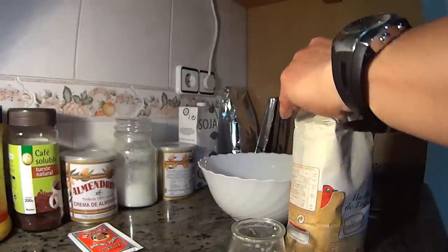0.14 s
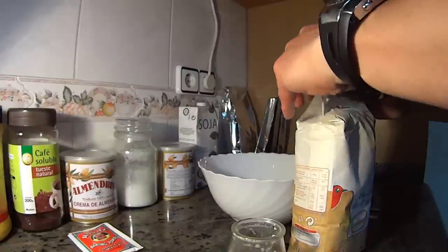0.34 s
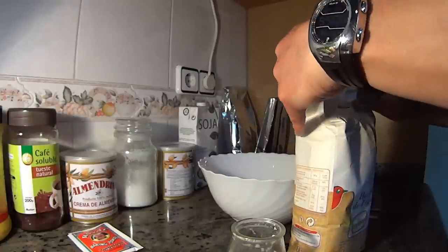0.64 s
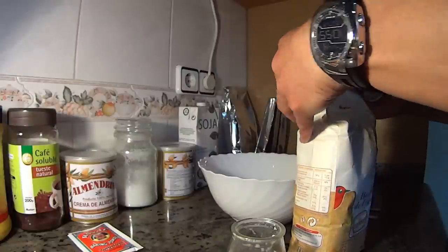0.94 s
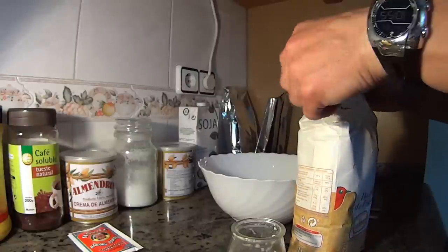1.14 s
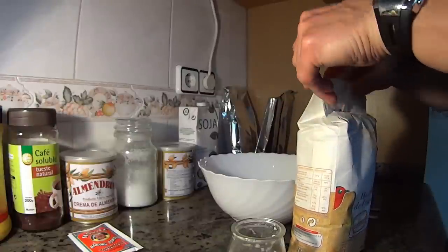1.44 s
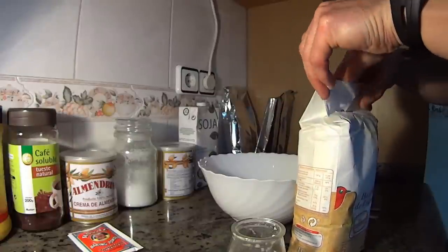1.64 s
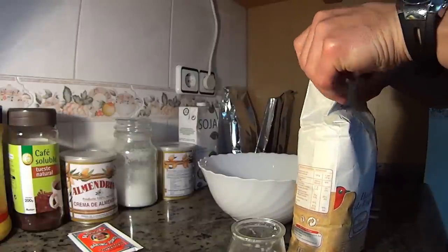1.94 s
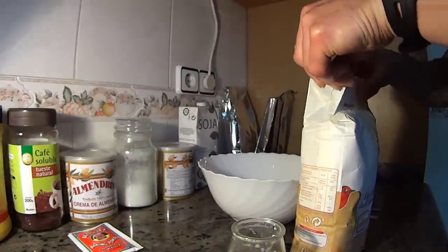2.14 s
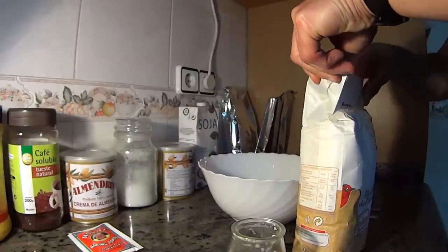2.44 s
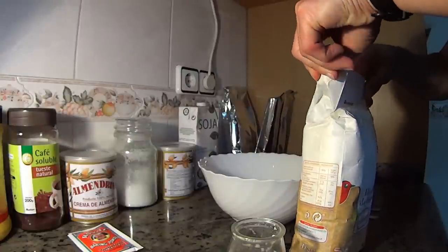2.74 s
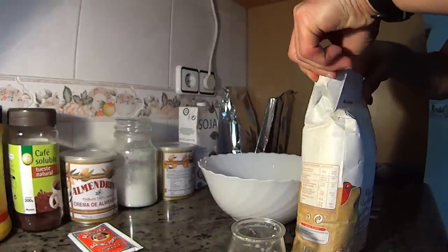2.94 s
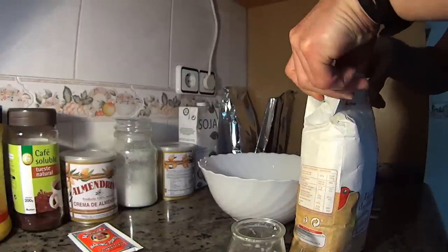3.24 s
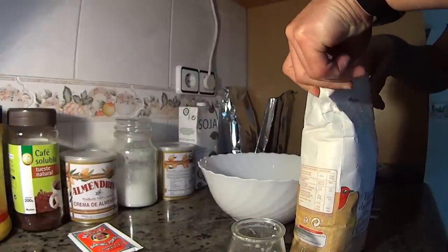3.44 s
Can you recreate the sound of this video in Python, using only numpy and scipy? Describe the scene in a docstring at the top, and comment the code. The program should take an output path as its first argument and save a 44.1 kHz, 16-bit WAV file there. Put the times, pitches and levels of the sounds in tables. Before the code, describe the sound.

A stiff, full paper bag crackles and rustles as a hand unfolds its top, starting with light snaps, then growing denser and louder, with soft hollow thumps, close stereo microphones in a small quiet kitchen.

```python
"""In a kitchen, a hand unfolds the top of a full paper bag on the counter.
Creases snap as sharp cracks with dying runs of slips, answered closely by counter, tiles and jars.
Between them paper rustles and fingertips skid, built from dense random clicks shaped by filters.
Now and then the bag's wall gives: a hollow noise burst over a low boom of decaying sines.
A short noise tail makes the faint room, and filtered noise makes its quiet hush."""
import sys
import numpy as np
from scipy import signal
from scipy.fft import rfft, irfft, next_fast_len
from scipy.io import wavfile

SR = 44100
rng = np.random.default_rng(int(sys.argv[2]) if len(sys.argv) > 2 else 0)


def put_to_file(sound):
    """Save the sound as 16-bit audio at rate SR, in the file named by the first command-line argument."""
    columns = np.atleast_2d(sound).T  # one column per channel
    safe = np.clip(columns, -1, 1)
    whole_steps = np.round(safe * 32767)
    wavfile.write(sys.argv[1], SR, whole_steps.astype(np.int16))


N = 158760
T = np.arange(N) / SR
FFT_SIZE = next_fast_len(N + SR)
HZ = np.arange(FFT_SIZE // 2 + 1) * SR / FFT_SIZE

# Levels are relative unless noted; decays without "T60" are the times to fall to 1/e.
# Creases buckling: (time [s], middle [dB], upper [dB], treble [dB], decay of the slips [s])
SNAPS = [(0.1989, -37, -35, -28, 0.0077), (0.2589, -30.5, -49, -25.5, 0.00093),
         (0.4024, -35.5, -44, -40, 0.0027), (0.4508, -39.5, -38.5, -30, 0.0024),
         (0.5081, -36, -45, -31, 0.0049), (0.5627, -33.5, -36.5, -20, 0.00063),
         (0.602, -36, -40, -30, 0.0013), (0.6391, -26.5, -30, -21.5, 0.0036),
         (0.6805, -27, -33.5, -18.5, 0.0032), (0.7975, -33, -31, -28.5, 0.0017),
         (0.835, -42, -45, -32, 0.0021), (0.9361, -31.5, -34, -21.5, 0.0017),
         (1.0357, -37, -37.5, -24.5, 0.0003), (1.251, -66, -53.5, -41.5, 0.0003),
         (1.4036, -32.5, -33.5, -26.5, 0.0026), (1.451, -27.5, -36, -36, 0.0074),
         (1.5963, -28, -32, -32, 0.0027), (1.618, -25.5, -55, -26.5, 0.00054),
         (1.731, -27, -31.5, -21.5, 0.0053), (1.763, -29, -51, -20, 0.0006),
         (1.777, -28.5, -31, -32, 0.0029), (1.81, -32.5, -36, -20, 0.00099),
         (1.8412, -24, -42, -24.5, 0.0041), (1.9603, -25.5, -30, -25, 0.0094),
         (2.03, -37.5, -40, -26, 0.0014), (2.0887, -32.5, -38.5, -52, 0.003),
         (2.134, -35, -23.5, -28.5, 0.00022), (2.1825, -24.5, -39, -19, 0.0013),
         (2.3069, -25, -37, -23.5, 0.0037), (2.3386, -24, -26, -27.5, 0.0097),
         (2.5135, -28, -28.5, -26.5, 0.00012), (2.5592, -40, -38, -30, 0.00058),
         (2.5852, -26.5, -31.5, -22, 0.00044), (2.655, -21, -29, -21.5, 0.00084),
         (2.7099, -23, -30.5, -35, 0.00067), (2.7801, -21.5, -65, -52, 0.00074),
         (2.8336, -29, -32, -24.5, 0.0039), (2.896, -26.5, -48, -21, 0.0071),
         (3.3615, -64, -59, -31, 0.0012), (3.386, -25.5, -53, -15, 0.0027),
         (3.4248, -23.5, -30.5, -21.5, 0.0061)]
# Edges of the three registers of a snap: (frequency [Hz])
SNAP_EDGES_HZ = [650, 2800, 5000, 14000]
# Colour of the snapping paper: (frequency [Hz], gain [dB])
SNAP_COLOUR = [(700, -6), (1400, 0.5), (2600, -2), (5900, 7), (7000, 0.5), (9000, -2), (11500, -15.5)]
SNAP_GAIN_DB, SLIPS_PER_S, SLIP_DB = 27, 7000, -13
ECHO_DECAY_S, ECHO_DB, ECHO_DELAY_S = 0.005, 3.5, 0.00089

# Paper moving between snaps: (time [s], creasing level [dB], sliding level [dB])
RUSTLE = [(0, -49.5, -42.5), (0.25, -42, -38.5), (0.366, -42.5, -39), (0.39, -55.5, -53.5),
          (0.68, -41, -35.5), (0.925, -52, -48), (0.99, -41, -38), (1.07, -54, -54.5), (1.44, -50, -46),
          (1.491, -40, -31), (1.72, -43, -35), (1.81, -41.5, -39.5), (1.86, -35.5, -27.5),
          (1.93, -45, -38.5), (2.16, -50, -45), (2.201, -35.5, -30.5), (2.295, -47, -43),
          (2.345, -40.5, -34.5), (2.55, -41, -40), (2.601, -38, -31), (2.8, -46.5, -47.5),
          (2.885, -49, -45), (2.909, -39, -30.5), (3.018, -53.5, -55), (3.1, -46.5, -38.5),
          (3.37, -50.5, -38), (3.419, -32, -31), (3.501, -46, -41)]
# Dull spectrum of creasing: (frequency [Hz], density [dB per Hz])
CREASING_COLOUR = [(80, -11.5), (130, 5), (220, -1.5), (320, -5.5), (430, -2), (2800, 0), (5000, -23.5)]
# Bright spectrum of sliding: (frequency [Hz], density [dB per Hz])
SLIDING_COLOUR = [(1500, -18.5), (2700, -22), (3500, -3), (5850, 1.5), (7100, -6.5), (8400, -7),
                  (10500, -12.5), (11600, -22), (15000, -28.5)]
CREASING_GRAINS_PER_S, CREASING_SPREAD_DB = 2200, 2
SLIDING_GRAINS_PER_S, SLIDING_SPREAD_DB = 9000, 0.5
TICKS_PER_S, TICK_DB, TICK_SPREAD_DB, TICK_DECAY_S = 90, -2, 3.5, 0.0016
CLUMPS_PER_S, CLUMP_DB = 150, 6.5   # the grip sticks and slips
# Air ringing in the folded top: (time [s], resonance [Hz])
HOLLOW = [(1.68, 1170), (2.21, 1920), (2.34, 1310), (2.6, 1490), (2.93, 1250)]
HOLLOW_WIDTH_HZ, HOLLOW_GAIN, OPEN_S = 450, 2.1, 3.08   # the ring grows until the top is open

# Fingertip skids: (time of the height [s], level [dB], centre [Hz])
SCUFFS = [(0.04, -33, 5300), (1.015, -33.5, 6200), (1.157, -41, 4370), (1.348, -39, 6000),
          (3.058, -32.5, 5300), (3.205, -29.5, 5250), (3.309, -27.5, 6800)]
SCUFF_SPREAD_S, SCUFF_WIDTH = 0.012, 0.46   # standard deviation of the swell; band edges at centre x or / 1.46

# The bag's wall giving: (time [s], panel level [dB], panel pitch [Hz], boom level [dB])
THUDS = [(0.949, -29.5, 680, -50), (1.402, -35.5, 427, -51), (1.617, -36, 597, -41.5),
         (1.841, -39, 580, -41.5), (2.002, -35.5, 406, -43), (2.096, -33, 640, -47),
         (2.473, -30.5, 430, -43), (2.898, -23.5, 830, -43), (3.423, -29, 393, -35.5)]
# Low modes of the full bag, before small random shifts: (frequency [Hz], level [dB], T60 [s])
BOOM_MODES = [(133.7, 3, 0.14), (179, -0.5, 0.14), (236.3, -0.5, 0.2)]
PANEL_DECAY_S, PANEL_WIDTH = 0.0047, 0.7   # band edges at pitch x or / 1.7
THUD_ATTACK_S, THUD_REFERENCE_S = 0.0038, 0.014   # the reference length turns energy into level

# Spread between the ears: (frequency [Hz], strength of the side signal [ratio])
WIDTH = [(130, 0.21), (700, 0.4)]
# Lead of the left ear: (frequency [Hz], phase [rad])
LEAD = [(130, 0.0076), (600, 1), (2100, 1), (3500, 0.32)]
PAN_DB = -1.5   # left minus right
ROOM_DB, ROOM_T60_S, ROOM_TREBLE_T60_S, ROOM_SPLIT_HZ = -8.5, 0.29, 0.14, 6400
CUTOFF_HZ = 15800

# Spectrum of the room's hush: (frequency [Hz], density [dB per Hz])
HUSH_COLOUR = [(60, -7), (130, -1.5), (400, -8), (15000, -22)]
HUSH_DB = -55.5


def from_db(db):
    """Decibels to gain."""
    return 10 ** (np.asarray(db) / 20)


def unit(x):
    """Scale to an energy of one."""
    return x / np.sqrt(np.sum(x ** 2) + 1e-20)


def rms_one(x):
    """Scale to an rms of one."""
    return unit(x) * np.sqrt(x.size)


def over_hz(points):
    """Read a table on the log-frequency axis."""
    hz, value = np.transpose(points)
    return np.interp(np.log(HZ + 1), np.log(hz), value)


def colour(x, points):
    """Causal (minimum-phase) filter with the given spectrum."""
    cepstrum = irfft(np.log(from_db(over_hz(points))), FFT_SIZE)
    # folding the cepstrum onto positive time gives minimum phase
    cepstrum[1:FFT_SIZE // 2] *= 2
    cepstrum[FFT_SIZE // 2 + 1:] = 0
    response = np.exp(rfft(cepstrum))
    return irfft(rfft(x, FFT_SIZE) * response, FFT_SIZE)[..., :N]


def band(x, low, high, order=2):
    """Butterworth band-pass."""
    edges = [low, min(high, SR / 2 - 1000)]
    sos = signal.butter(order, edges, "band", fs=SR, output="sos")
    return signal.sosfilt(sos, x + 1e-18)


def around(x, hz, width):
    """Band-pass reaching equally far in pitch below and above a centre."""
    return band(x, hz / (1 + width), hz * (1 + width))


def add(out, s, sound):
    """Mix a sound in at a time."""
    i = int(s * SR)
    out[:, i:i + sound.shape[1]] += sound[:, :N - i]


def grains(per_s, spread_db, size):
    """Random clicks of either sign: many small, a few large."""
    sizes = from_db(spread_db * np.minimum(rng.exponential(1, size), 4.5))
    struck = rng.random(size) < per_s / SR
    return struck * sizes * rng.choice([-1, 1], size)


def snaps():
    """Each crease lets go with one crack and a dying run of slips, echoing closely; mid and side."""
    out, t = np.zeros((2, N)), T[:SR // 12]
    for s, *levels, decay_s in SNAPS:
        fade = np.exp(-t / max(decay_s, 1e-4))
        slips = from_db(SLIP_DB) * grains(SLIPS_PER_S, 1.0, size=len(t)) * fade
        slips[0] = 1   # the crack itself
        crack = echoes(slips)
        snap = np.zeros_like(crack)
        for k, (db, low, high) in enumerate(zip(levels, SNAP_EDGES_HZ, SNAP_EDGES_HZ[1:])):
            # neighbouring registers alternate in sign
            snap += (-1) ** k * from_db(db) * unit(band(crack, low, high, order=3))
        add(out, s, snap)
    return from_db(SNAP_GAIN_DB) * colour(out, SNAP_COLOUR)


def echoes(x):
    """Counter, tiles and jars return dense close echoes, new for each snap; mid and side."""
    t = T[:len(x)]
    decay = np.exp(-t / ECHO_DECAY_S) * (t > ECHO_DELAY_S)
    paths = from_db(ECHO_DB) * unit(rng.standard_normal((2, len(t))) * decay)
    paths[0, 0] = 1   # direct sound, in the mid only
    return signal.fftconvolve(paths, x[None])[:, :len(t)]


def rustle():
    """Clumped fibre slips, dull from creasing and bright from sliding, share sparse ticks; mid and side."""
    s, creasing_db, sliding_db = np.transpose(RUSTLE)
    knots = np.cumsum(rng.exponential(1 / CLUMPS_PER_S, SR // 20))
    grip = from_db(CLUMP_DB * np.interp(T, knots, rng.uniform(-0.58, 1, len(knots))))

    clicks = abs(grains(TICKS_PER_S, TICK_SPREAD_DB, size=N))
    bursts = signal.lfilter([1], [1, -np.exp(-1 / (TICK_DECAY_S * SR))], clicks + 1e-18)
    ticks = from_db(TICK_DB) * rms_one(bursts * rng.standard_normal((2, N)))

    creases = rms_one(grains(CREASING_GRAINS_PER_S, CREASING_SPREAD_DB, size=(2, N)))
    creasing = rms_one(colour(creases + ticks, CREASING_COLOUR))
    slips = rms_one(grains(SLIDING_GRAINS_PER_S, SLIDING_SPREAD_DB, size=(2, N)))
    sliding = rms_one(colour(slips + ticks, SLIDING_COLOUR))

    dull = hollow(creasing) * from_db(np.interp(T, s, creasing_db))
    bright = sliding * from_db(np.interp(T, s, sliding_db))
    return grip * (dull + bright)


def hollow(x, size=128):
    """Air in the folded top adds a broad resonance that shifts and grows as it is pulled open."""
    ring, state = np.zeros_like(x), np.zeros((2, 2))
    r = np.exp(-np.pi * HOLLOW_WIDTH_HZ / SR)   # pole radius
    w = 2 * np.pi * np.interp(T, *np.transpose(HOLLOW)) / SR
    for i in range(0, N, size):
        poles = [1, -2 * r * np.cos(w[i]), r * r]
        ring[:, i:i + size], state = signal.lfilter([1, 0, -1], poles, x[:, i:i + size], zi=state)
    opening = np.minimum(T / OPEN_S, 1) ** 2
    return x + HOLLOW_GAIN * opening * (1 - r * r) / 2 * ring


def scuffs():
    """A fingertip skids over the paper: a short swell of fine slips in one band; mid and side."""
    out, t = np.zeros((2, N)), T[:SR // 16]
    swell = np.exp(-((t - t.mean()) / SCUFF_SPREAD_S) ** 2 / 2)
    for s, db, hz in SCUFFS:
        slips = grains(SLIDING_GRAINS_PER_S, SLIDING_SPREAD_DB, size=(2, len(t)))
        skid = rms_one(around(slips, hz, SCUFF_WIDTH))
        add(out, max(s - t.mean(), 0), from_db(db) * swell * skid)
    return out


def thuds():
    """A paper panel pops hollowly and shakes the low modes of the full bag; mid and side."""
    out, t = np.zeros((2, N)), T[:SR // 4]
    rise = 1 - np.exp(-t / THUD_ATTACK_S)
    for s, db, hz, boom_db in THUDS:
        burst = rng.standard_normal((2, len(t))) * rise * np.exp(-t / PANEL_DECAY_S)
        panel = from_db(db) * unit(around(burst, hz, PANEL_WIDTH))
        boom = np.zeros(len(t))
        for mode_hz, mode_db, t60 in BOOM_MODES:
            gain = from_db(mode_db + rng.normal(0, 0.28))
            tone = np.sin(2 * np.pi * mode_hz * rng.normal(1, 0.023) * t)
            boom += gain * tone * from_db(-60 * t / t60)
        boom = from_db(boom_db) * unit(boom * rise) * [[2], [0]]   # mid only
        add(out, s, np.sqrt(THUD_REFERENCE_S * SR) * (panel + boom))
    return out


def kitchen(x):
    """The sound (mid and side) and the room's short tail reach two closely spaced microphones."""
    left_right, t = np.array([[1], [-1]]), T[:SR // 2]
    low, high = rng.standard_normal((2, 2, len(t)))
    tail = band(low, 155, ROOM_SPLIT_HZ) * from_db(-60 * t / ROOM_T60_S)
    tail += band(high, ROOM_SPLIT_HZ, CUTOFF_HZ) * from_db(-60 * t / ROOM_TREBLE_T60_S)
    spectra = rfft(x, FFT_SIZE)
    # the mid alone excites the room
    room = from_db(ROOM_DB) * spectra[0] * rfft(unit(tail), FFT_SIZE)
    mid, side = spectra + room
    balance = from_db(left_right * PAN_DB / 2)
    lead = np.exp(left_right * 1j * over_hz(LEAD) / 2)
    pair = (mid + left_right * over_hz(WIDTH) * side) * balance * lead
    return irfft(pair, FFT_SIZE)[:, :N]


def background():
    """The quiet hush of the room: coloured noise, partly shared by both sides."""
    noise = rng.standard_normal(N) + 1.2 * rng.standard_normal((2, N))
    return from_db(HUSH_DB) * rms_one(colour(noise, HUSH_COLOUR))


def scene():
    """The bag in the kitchen, over the room's hush."""
    bag = snaps() + rustle() + scuffs() + thuds()
    return kitchen(bag) + background()


def record(dry):
    """Saturation rounds the peaks, then a steep low-pass cuts the top."""
    low_pass = signal.cheby1(12, .2, CUTOFF_HZ, fs=SR, output="sos")
    return signal.sosfilt(low_pass, np.tanh(dry))


dry = scene()
out = record(dry)
put_to_file(out)
```